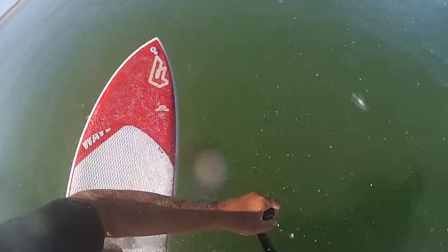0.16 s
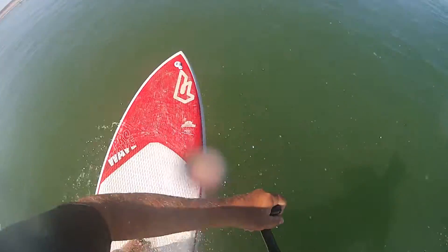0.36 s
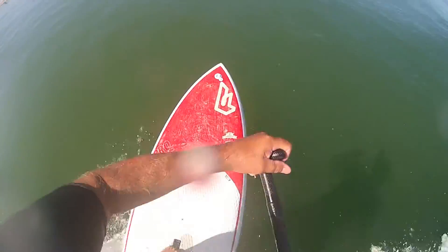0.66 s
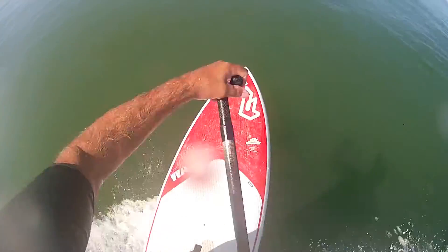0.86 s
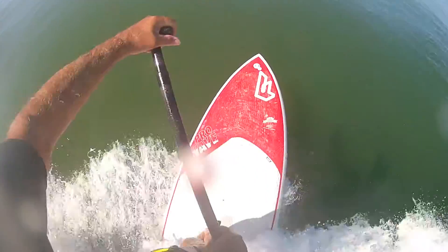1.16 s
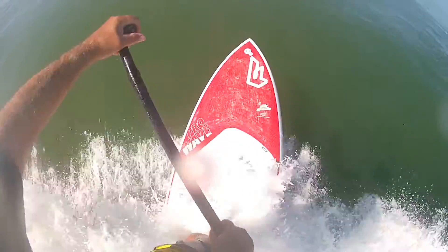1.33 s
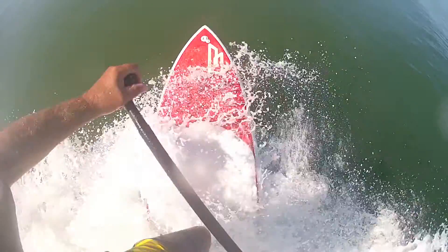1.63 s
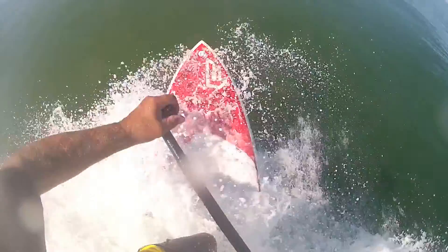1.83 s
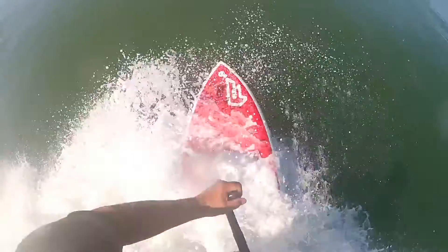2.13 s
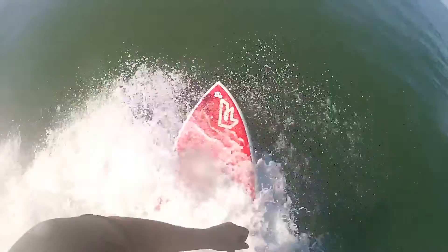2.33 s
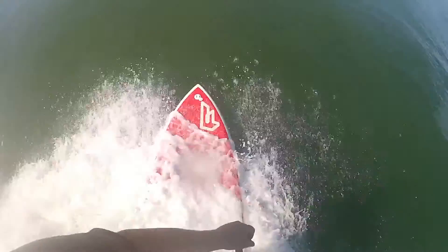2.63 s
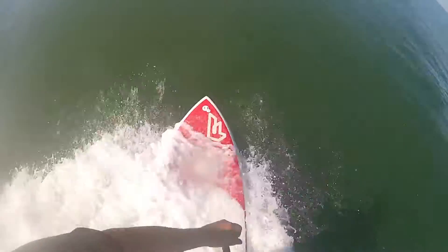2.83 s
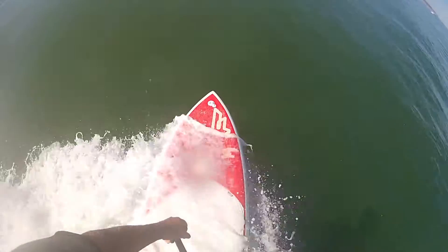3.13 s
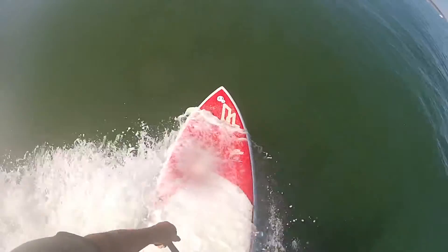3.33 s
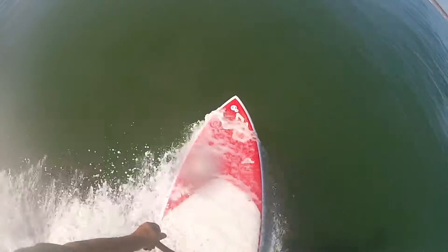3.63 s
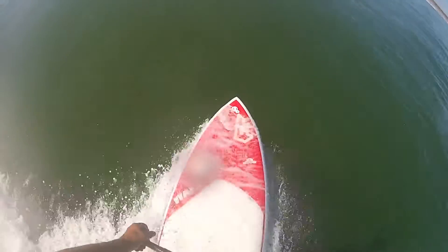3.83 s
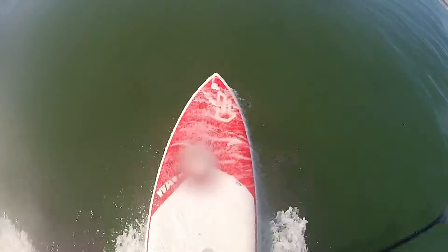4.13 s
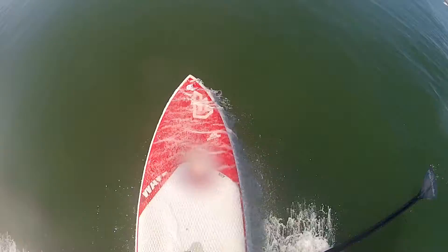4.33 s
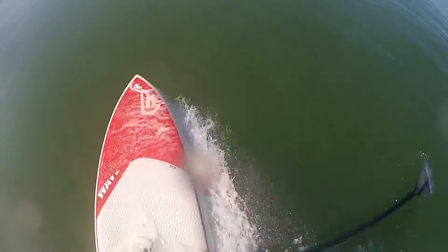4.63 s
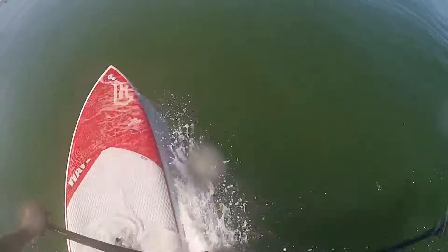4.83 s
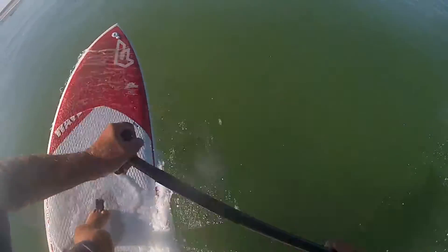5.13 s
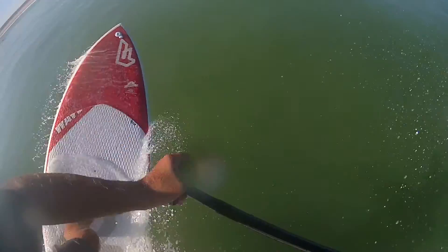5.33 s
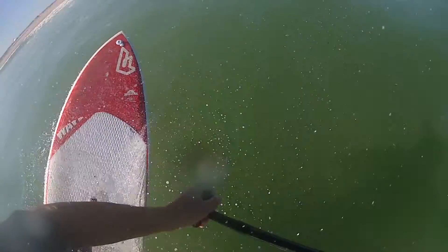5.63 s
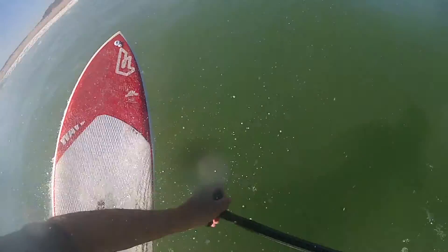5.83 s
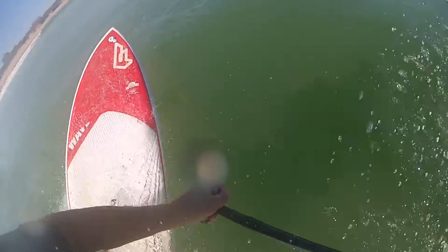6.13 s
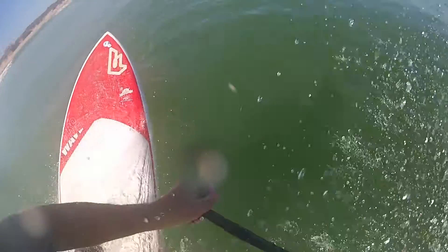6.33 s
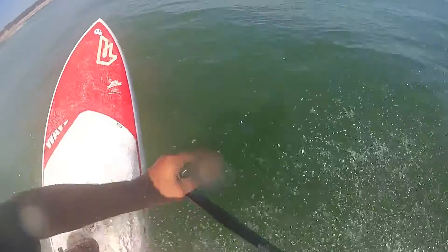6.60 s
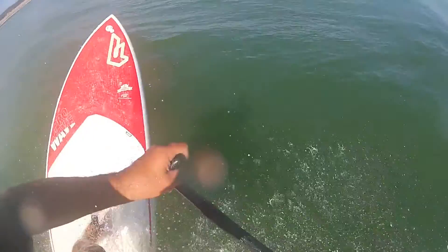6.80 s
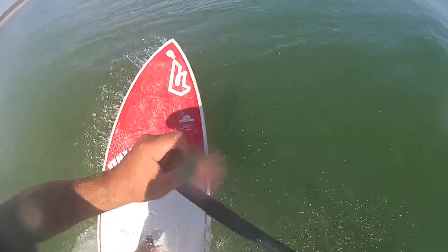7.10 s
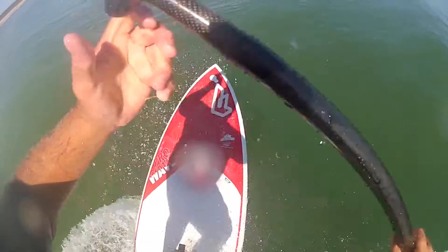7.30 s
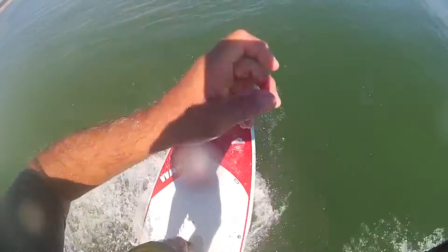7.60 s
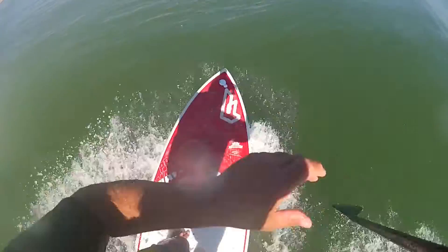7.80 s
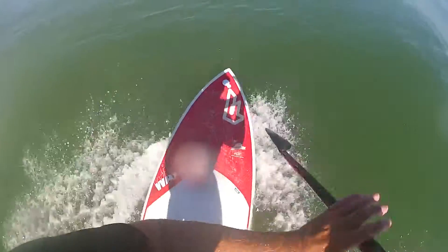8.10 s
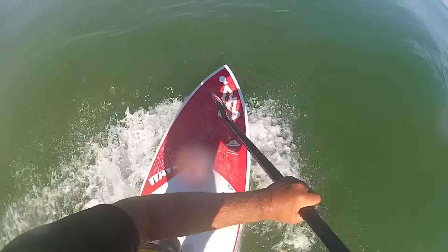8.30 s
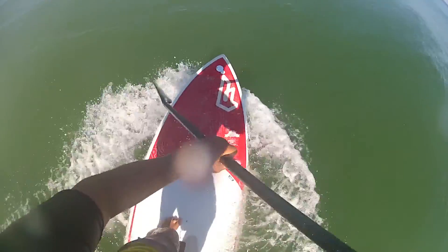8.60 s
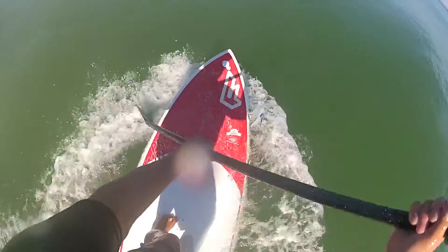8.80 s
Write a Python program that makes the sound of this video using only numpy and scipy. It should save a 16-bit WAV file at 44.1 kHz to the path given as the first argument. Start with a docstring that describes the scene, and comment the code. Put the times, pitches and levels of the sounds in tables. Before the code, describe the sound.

Whitewater churns and hisses along a paddleboard with a hollow, gritty wash, low rumble, wind thumps and small drop taps, gradually easing.

```python
"""Whitewater churns and sprays along the rails of a paddleboard riding a small breaking wave.
Countless bubbles sum to a hollow wash above the rumble of the hull, and both ease as the flow slows.
The listening point is a sealed housing on the rider: wind buffets it and drops excite its modes.
A sample-and-hold at a low rate mirrors the muffled sound into a gritty treble."""
import sys
import numpy as np
from scipy import signal
from scipy.fft import rfft, irfft, next_fast_len
from scipy.io import wavfile
from scipy.ndimage import uniform_filter1d

SR = 44100
rng = np.random.default_rng(int(sys.argv[2]) if len(sys.argv) > 2 else 0)


def log_audio(samples):
    """Write samples as a 16-bit WAV file to the path given in sys.argv[1]."""
    # one column per channel
    frames = np.atleast_2d(samples).T
    # limit to full scale, then quantise
    limited = np.clip(frames, -1, 1)
    pcm = np.round(limited * 32767).astype(np.int16)
    wavfile.write(sys.argv[1], SR, pcm)


N = 394685

# flow of water past the board: (time [s], level [dB])
FLOW = [(0.0, -44), (0.25, -45.5), (1.22, -43), (1.42, -45), (1.74, -45), (2.74, -48), (4.54, -48),
        (5.21, -51.5), (6.48, -49.5), (8.95, -57.5)]
# the rail digs in and throws up a sheet of whitewater: (time [s], lift [dB], length [s])
RAIL_SURGES = [(0.15, 2, .15), (0.818, 1.5, .18), (1.18, 1.5, 0.15), (2.32, 1.5, .15), (3.196, 0.7, .1),
               (4.55, 1, .2), (6.055, 1.5, .2), (6.512, 3, 0.34), (7.354, 3.5, 0.087), (7.68, 5.5, 0.25),
               (7.953, 2.5, 0.23), (8.5, 1.5, 0.094)]


def whitewater():
    """One flow drives spray, churn and hull, so they ease together; surges lift the spray most."""
    flow_db = np.interp(np.arange(N) / SR, *np.transpose(FLOW))
    full_db = flow_db.max()
    slack_db = flow_db - full_db
    surge_db = sum(lift_db * swell(s, 0, length) for s, lift_db, length in RAIL_SURGES)
    return spray(full_db, slack_db, surge_db) + churn(full_db, slack_db, surge_db) + hull(full_db, slack_db)


# spectrum of fine spray: (frequency [Hz], relative level [dB])
SPRAY_SPECTRUM = [(800, -36.5), (900, -7), (970, -4), (1090, -0.5), (1190, -1), (1340, 2.5), (1450, 2.5),
                  (1580, -2.5), (1660, -9), (1740, -5.5), (1830, -7.5), (1980, -6.5), (2230, -12.5),
                  (2400, -21.5)]
# water running over the nose adds a lower ring: (time [s], level re spray [dB], length [s])
NOSE_AWASH = (4.27, -6.5, 2.43)


def spray(full_db, slack_db, surge_db):
    """Small bubbles excite a hollow resonance in the housing; its pitch rises with the flow's power."""
    fizz = froth(SPRAY_SPECTRUM, per_s=2500, spread_db=2.0, wash_db=0.0, flutter_db=0.5, flutter_hz=27)
    hollow_hz = 1320.6 + 110 * from_db(slack_db) ** 2
    hollow = from_db(-9.5) * resonance(hollow_hz, width_hz=47)
    nose = swell(*NOSE_AWASH) * resonance(1040, width_hz=105)
    return from_db(0.5 + full_db + slack_db + surge_db) * (fizz + hollow + nose)


# spectrum of large air pockets: (frequency [Hz], relative level [dB])
CHURN_SPECTRUM = [(180, -16.5), (300, -4), (390, -4.5), (490, -2.5), (560, -3), (640, 1), (710, -1.5),
                  (790, 1), (880, -7), (1000, -26.5)]


def churn(full_db, slack_db, surge_db):
    """Large air pockets resonate lower and need the fastest water, so they fade faster than the flow."""
    pockets = froth(CHURN_SPECTRUM, per_s=900, spread_db=1.5, wash_db=1.0, flutter_db=1.0, flutter_hz=20)
    return from_db(-2.5 + full_db + 1.11 * slack_db + 0.55 * surge_db) * pockets


# spectrum of the hull's rumble: (frequency [Hz], relative level [dB])
HULL_SPECTRUM = [(45, -11), (75, -0.5), (115, -1.5), (160, -3), (210, -6.5), (270, -11), (400, -27)]
# the hull drops onto the water: (time [s], level [dB], length [s])
HULL_BOOMS = [(1.28, -42.5, 0.093), (5.76, -50, 0.13), (6.28, -48.5, 0.064)]


def hull(full_db, slack_db):
    """Forced vibration: the flow and the impacts shake the hull, and their powers add."""
    planing = from_db(-0.07 + full_db + 1.116 * slack_db)
    booms = sum(swell(*boom) for boom in HULL_BOOMS)
    return np.hypot(planing, booms) * steady_noise(HULL_SPECTRUM, 0.3)


# spectrum of the steady air flow: (frequency [Hz], relative level [dB])
EDDY_SPECTRUM = [(6, -4.5), (12, 3.5), (24, -3), (34, -8), (50, -15.5), (68, -16), (100, -29.5)]
# spectrum of a gust: (frequency [Hz], relative level [dB])
GUST_SPECTRUM = [(10, -1.5), (18, 3.5), (30, -1), (45, -10.5), (65, -18), (100, -39.5)]
# gusts striking the housing: (time [s], level [dB], length [s])
GUSTS = [(1.05, -34, 0.53), (1.137, -21.5, 0.058), (2.263, -37, 0.051), (2.567, -33.5, 0.054),
         (4.13, -35, 0.03), (4.345, -34, 0.13), (5.04, -35.5, 0.15), (5.783, -35, 0.083),
         (6.307, -29.5, 0.17), (7.397, -28, 0.076), (7.586, -37.5, 0.04), (7.769, -21, 0.046),
         (8.5, -37.5, 0.074)]


def wind():
    """Turbulent pressure: eddies push slowly on the housing, and single gusts thump on it."""
    eddies = from_db(-41.5) * steady_noise(EDDY_SPECTRUM, 0.14)
    thumps = steady_noise(GUST_SPECTRUM, 0.14) * sum(swell(*gust) for gust in GUSTS)
    return eddies + thumps


# drops landing on the housing: (time [s], level [dB], pitch [Hz], 60 dB decay time [s])
DROPS = [(2.5142, -27, 695, 0.0076), (2.6202, -27, 570, 0.012), (5.4917, -26.5, 792, 0.0035),
         (5.6470, -31.5, 660, 0.017), (6.2105, -31, 595, 0.035), (6.2464, -23.5, 460, 0.02),
         (6.2490, -25.5, 600, 0.022), (6.3560, -34, 610, 0.015), (7.0404, -30.5, 540, 0.027),
         (7.1086, -31.5, 1610, 0.022), (7.2279, -29, 564, 0.021), (7.3160, -43, 700, .012),
         (8.5747, -39.5, 910, 0.016), (8.7165, -39, 560, .014)]
# modes of the housing: (frequency [Hz], relative level [dB], 60 dB decay time [s])
HOUSING_MODES = [(520, 0.5, 0.017), (813, 6.5, 0.01), (1066, 1, 0.016), (1440, -15, 0.014),
                 (1850, -23, 0.0062)]


def drops():
    """Impact excitation: each drop makes a pock at its own pitch and rings the modes of the housing."""
    out, t = np.zeros(N + SR), np.arange(SR // 20) / SR
    for s, level_db, hz, t60 in DROPS:
        strengths = rng.uniform(.85, 1.15, len(HOUSING_MODES))
        # a small, high-pitched drop hardly moves the low modes
        shell = sum(strength * from_db(db) * min(mode_hz / hz, 1) ** 2 * ring(t, mode_hz, mode_t60)
                    for strength, (mode_hz, db, mode_t60) in zip(strengths, HOUSING_MODES))
        tap = ring(t, hz, t60) + shell
        start = int(s * SR)
        out[start:start + len(t)] -= from_db(level_db + 0.5) * tap / np.abs(tap).max()
    return out[:N]


# dollops of spray hitting the water: (time [s], level [dB], length [s])
SLAPS = [(0.767, -39.5, 0.013), (2.985, -44.5, 0.009), (5.993, -39, 0.0055), (7.603, -47.5, .014),
         (7.640, -36.5, 0.0035), (7.655, -40, 0.0034), (8.448, -46.5, 0.0078), (8.786, -49.5, 0.017)]


def slaps():
    """Air entrainment: each dollop falls back into the wave as a packed burst of small bubbles."""
    return steady_noise(SPRAY_SPECTRUM, 0.012) * sum(swell(*slap) for slap in SLAPS)


# a brief hollow ring in the wash: (time [s], level [dB], length [s])
GURGLE_SWELL = (8.893, -50, 0.05)
# its partials: (frequency [Hz], relative level [dB])
GURGLE_PARTIALS = [(820, -4), (1295, 4), (1810, -9)]


def gurgle(waver):
    """Random frequency modulation makes a few tones waver as they rise briefly out of the wash."""
    tones = sum(from_db(db) * np.sin(phase_of(hz * (1 + waver * drift(24.8))))
                for hz, db in GURGLE_PARTIALS)
    return swell(*GURGLE_SWELL) * rms_one(tones)


def froth(spectrum, per_s, spread_db, wash_db, flutter_db, flutter_hz):
    """Shot noise: near bubbles burst singly over the Gaussian wash of countless far ones; rms 1."""
    sizes = from_db(spread_db * np.minimum(rng.exponential(1, N), 4))  # many small, a few large
    clicks = sizes * rng.choice([-1, 1], N) * (rng.random(N) < per_s / SR)
    bursts = rms_one(clicks) + from_db(wash_db) * rng.standard_normal(N)
    flutter = from_db(flutter_db * drift(flutter_hz))
    return rms_one(evened(coloured(bursts, spectrum), 0.19) * flutter)


def resonance(centre_hz, width_hz):
    """A noise-driven resonance wanders in amplitude and phase about its centre frequency; rms 1."""
    phase = phase_of(centre_hz * np.ones(N))
    return rms_one(drift(width_hz) * np.cos(phase) + drift(width_hz) * np.sin(phase))


def ring(t, hz, t60):
    """A softly struck damped mode builds up over half a cycle and decays exponentially."""
    attack = np.minimum(2 * hz * t, 1)
    return np.sin(2 * np.pi * hz * t) * from_db(-60 * t / max(t60, .002)) * attack


def swell(s, level_db, length):
    """A Gaussian envelope centred on time s."""
    return from_db(level_db) * np.exp(-2 * np.minimum(((np.arange(N) / SR - s) / length) ** 2, 20))


def steady_noise(spectrum, seconds):
    """Filtered Gaussian noise, its level evened over the given time."""
    return evened(coloured(rng.standard_normal(N), spectrum), seconds)


def coloured(x, spectrum):
    """Spectral shaping, falling 36 dB per octave beyond the end points; rms 1."""
    size = next_fast_len(N)
    hz = np.maximum(np.arange(size // 2 + 1) * SR / size, 1)
    points_hz, db = np.transpose(spectrum)
    octaves_outside = np.abs(np.log2(hz / np.clip(hz, points_hz[0], points_hz[-1])))
    gain = from_db(np.interp(np.log(hz), np.log(points_hz), db) - 36 * octaves_outside)
    return rms_one(irfft(rfft(x, size) * gain, size)[:N])


def drift(hz):
    """Low-passed noise wanders about hz times a second; spread 1."""
    step, settle = 40, 2000
    pole = np.exp(-2 * np.pi * hz * step / SR)
    noise = rng.standard_normal(N // step + settle + 2)
    slow = signal.lfilter([1], [1, -2 * pole, pole * pole], noise)[settle:]
    return np.interp(np.arange(N) / step, np.arange(len(slow)), rms_one(slow))


def evened(x, seconds):
    """Division by the running rms removes swells longer than the given time."""
    return x / np.sqrt(uniform_filter1d(x ** 2, max(int(seconds * SR), 2)) + 1e-6)


def phase_of(hz):
    """Phase is the time integral of frequency."""
    return 2 * np.pi * np.cumsum(hz) / SR


def from_db(db):
    """Decibels to amplitude ratio."""
    return 10 ** (np.asarray(db) / 20)


def rms_one(x):
    """Normalisation to rms 1."""
    return x / np.sqrt(np.mean(x ** 2) + 1e-20)


def scene():
    """Superposition: water, wind and drops add at one microphone."""
    return (whitewater() + slaps() + gurgle(waver=0.014) + wind() + drops())[None]


def record(dry):
    """Spectral imaging: band-limited sound held in steps gains mirror images that fill the treble."""
    hold_hz, cutoff_hz = 4800, 8900
    treble_hz, treble_db = (4800, 7650), -14.5
    narrow = signal.sosfilt(signal.ellip(10, .2, 70, .495 * hold_hz, fs=SR, output="sos"), dry[0])
    edges = np.arange(N + 1) / SR
    ticks = np.arange(int(edges[-1] * hold_hz) + 2) / hold_hz
    held = np.interp(ticks, edges[:-1], narrow)
    # the mean of the staircase over each output sample
    steps = np.diff(np.interp(edges, ticks, np.cumsum(held) / hold_hz)) * SR
    treble = signal.sosfilt(signal.butter(1, treble_hz, "band", fs=SR, output="sos"), steps)
    bright = steps + from_db(treble_db) * treble
    return signal.sosfilt(signal.ellip(12, .1, 80, cutoff_hz, fs=SR, output="sos"), bright)[None]


dry = scene()
out = record(dry)
log_audio(out)
```